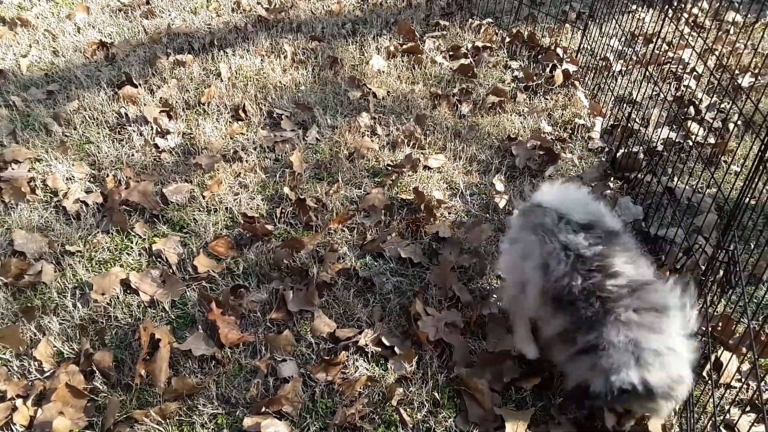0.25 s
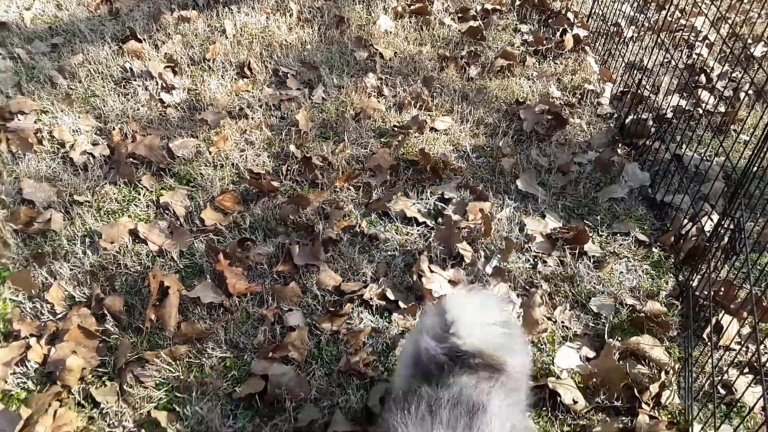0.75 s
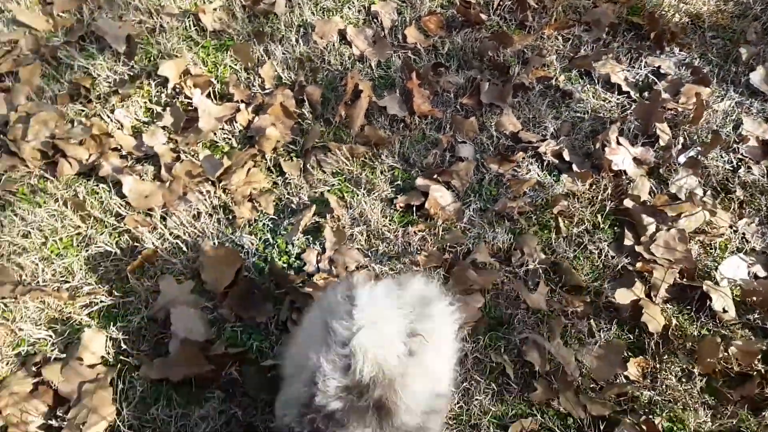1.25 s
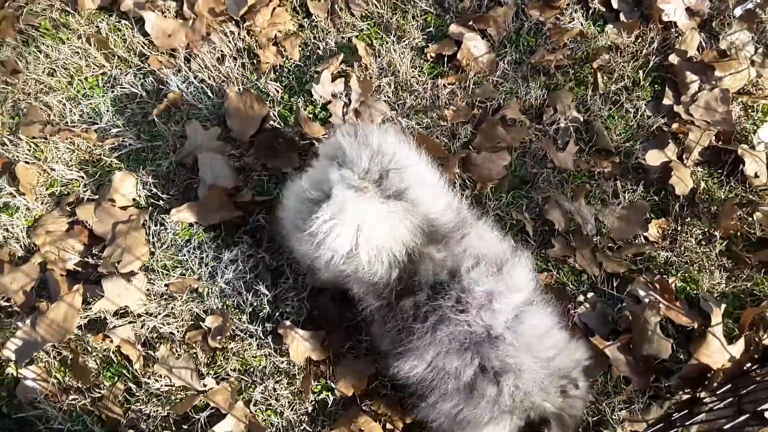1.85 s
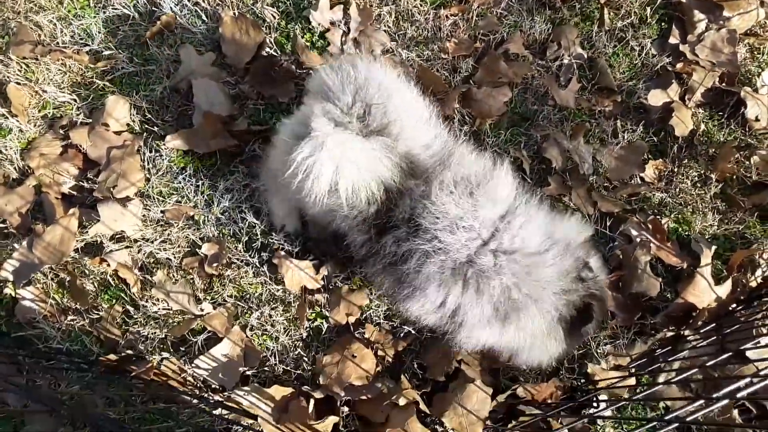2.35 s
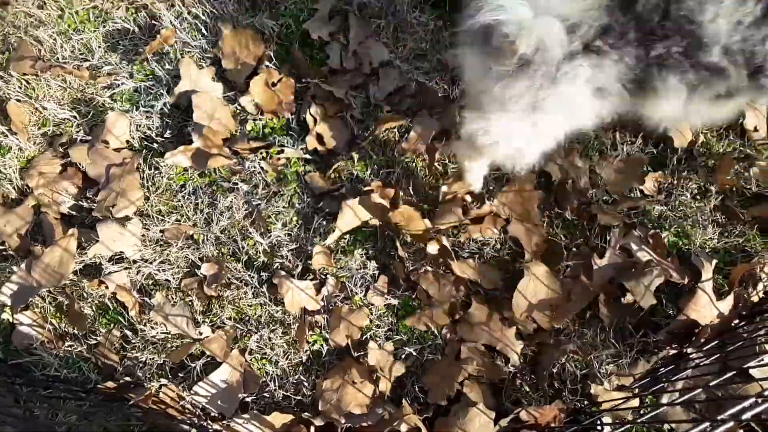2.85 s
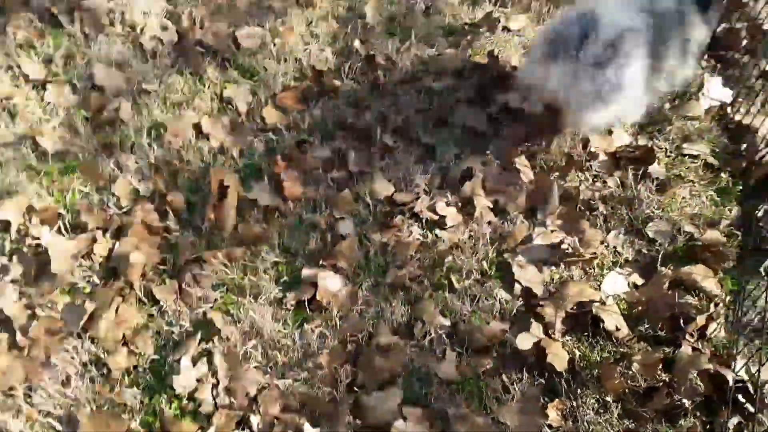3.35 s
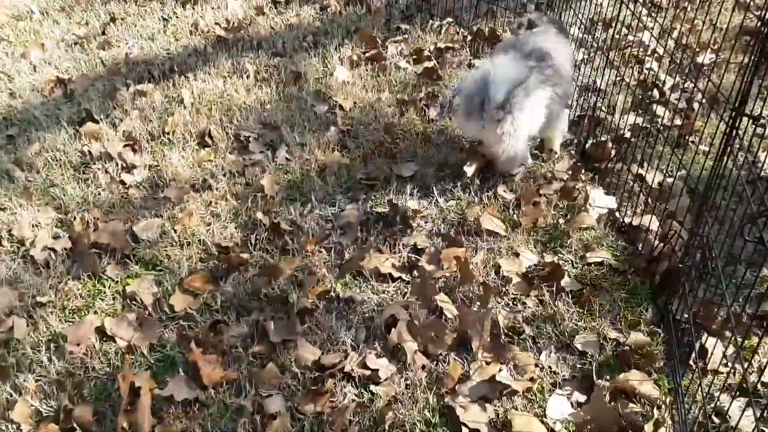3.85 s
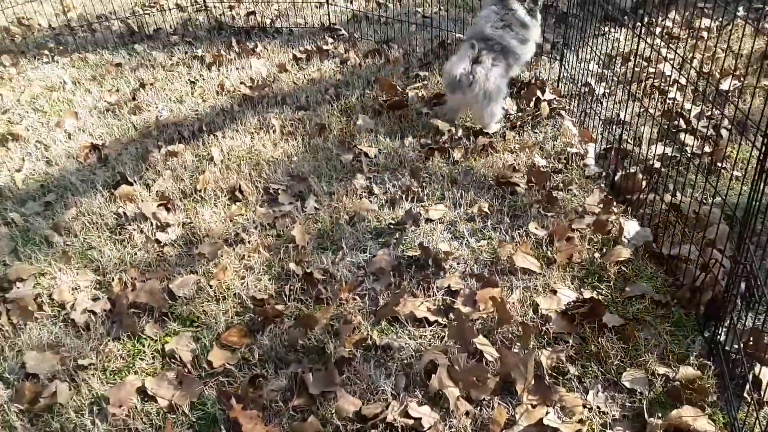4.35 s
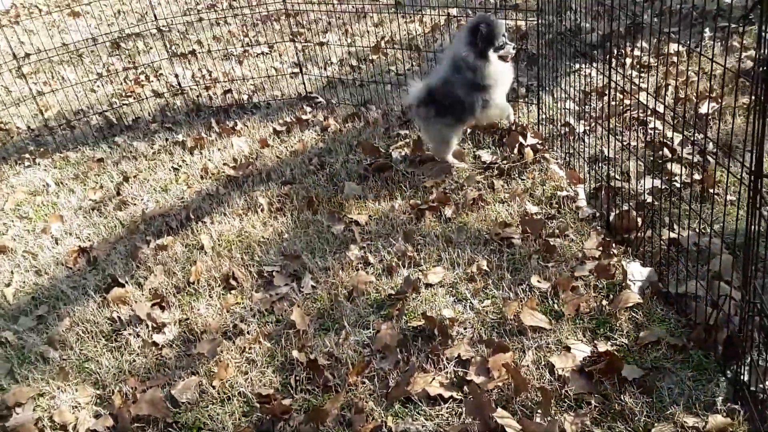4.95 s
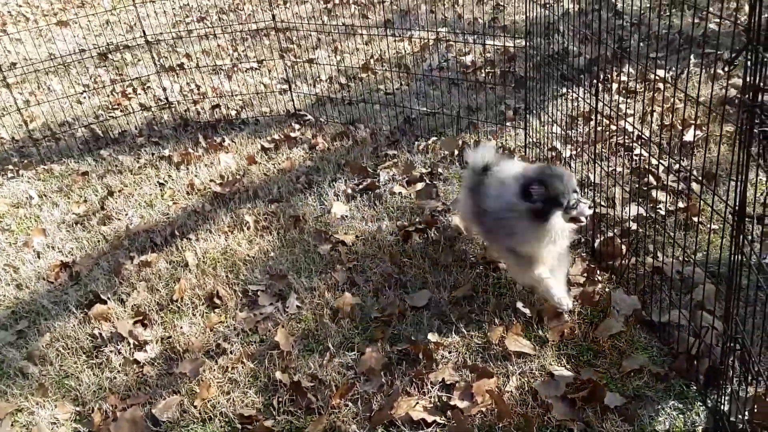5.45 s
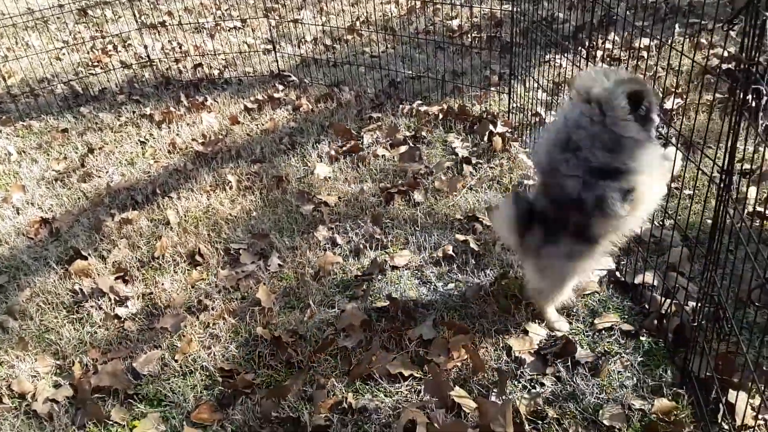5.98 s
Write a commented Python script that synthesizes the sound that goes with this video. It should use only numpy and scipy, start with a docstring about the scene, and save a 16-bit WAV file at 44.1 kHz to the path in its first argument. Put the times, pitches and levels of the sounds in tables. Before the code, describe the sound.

A small dog scampers through dry fallen leaves with crisp, irregular crunches and snaps, one tiny squeak, soft huffs, and a distant vehicle accelerating.

```python
"""A puppy scampers through dry leaves on a lawn, close to the microphones of a camera.
Each stroke of its paws crushes leaves into clouds of tiny cracks, and bursts of noise make single stems snap.
It gives one thin squeak, a gliding whistle, then huffs, noise shaped by its muzzle, along a wire pen whose
ringing tones tinkle faintly. Far away a motor vehicle, built from wavering tones, pulls away over traffic."""
import sys
import numpy as np
from scipy import signal
from scipy.fft import rfft, irfft, next_fast_len
from scipy.io import wavfile
from scipy.ndimage import uniform_filter1d, map_coordinates

SR = 44100
rng = np.random.default_rng(int(sys.argv[2]) if len(sys.argv) > 2 else 0)


def unload_audio(sound):
    """Save the sound as a 16-bit wav file, at the path given as the first command line argument."""
    columns = np.transpose(np.atleast_2d(sound))
    # keep every value between -1 and 1, then stretch to whole-number steps
    steps = np.round(np.clip(columns, -1, 1) * 32767)
    wavfile.write(sys.argv[1], SR, steps.astype(np.int16))


N = 274281  # length in samples
TOP_HZ = 16050  # upper limit of the sound

# The colour of leaves crushed close by. Each row: frequency in Hz, relative level in dB.
LEAF_COLOUR = [(150, -38), (250, -9), (947, -9.5), (1420, -7.5), (1940, 1.5), (2240, -14), (2810, -2.5),
               (3590, -5.5), (4280, 0), (5100, -6), (6520, 0.5), (8480, -7), (13100, -3.5), (15100, -11.5),
               (16500, -70)]


def amp(db):
    """Turn decibels into gain."""
    return 10 ** (np.asarray(db) / 20)


def unit(x):
    """Scale to an rms (average strength) of 1."""
    return x / np.sqrt(np.mean(x ** 2) + 1e-20)


def along(points, hz):
    """Read a table of (Hz, value) points on a logarithmic frequency axis."""
    f, v = np.transpose(points)
    return np.interp(np.log(hz + 1), np.log(f + 1), v)


def curves(rows):
    """Draw a line through each column after the time: one value per sample."""
    s, *cols = np.transpose(rows)
    return [np.interp(np.arange(N) / SR, s, c) for c in cols]


def during(rows):
    """Give 1 while a table lasts and 0 outside, with soft edges."""
    t = np.arange(N) / SR
    inside = (t >= rows[0][0]) & (t <= rows[-1][0])
    return uniform_filter1d(1. * inside, size=200)


def wobble(rate):
    """Make a smooth random curve with so many random points a second."""
    points = rng.standard_normal(int(N * rate / SR) + 4)
    return map_coordinates(points, [np.arange(N) * rate / SR])


def filtered(x, response):
    """Multiply the spectrum of a sound by a gain that depends on frequency."""
    n = x.shape[-1]
    m = next_fast_len(n + 8192)
    return irfft(rfft(x, m) * response(np.fft.rfftfreq(m, 1 / SR)), m)[..., :n]


def below(hz, edge_hz, order=8):
    """Gain that keeps what lies below an edge."""
    return 1 / np.sqrt(1 + (hz / edge_hz) ** order)


def above(hz, edge_hz, order=8):
    """Gain that keeps what lies above an edge."""
    return np.sqrt(1 - below(hz, edge_hz, order=order) ** 2)


def resonances(modes, hz):
    """Gain of a set of resonances, each with a centre in Hz, a width in Hz and a level in dB."""
    power = sum(amp(db) ** 2 / (1 + (2 * (hz - centre) / width) ** 2) ** 2 for centre, width, db in modes)
    return np.sqrt(power)


def panned(balance_db):
    """Left and right gains; a positive balance makes the left louder."""
    return amp(np.outer([.5, -.5], balance_db))


def add(track, s, sound):
    """Mix a sound into a stereo track at time s."""
    part = track[:, round(s * SR):][:, :sound.shape[1]]
    part += sound[:, :part.shape[1]]


def noise(spectrum, width):
    """Coloured stereo noise of rms 1; width is the difference signal relative to the shared one."""
    mid, side = filtered(rng.standard_normal((2, N)), lambda hz: amp(along(spectrum, hz)))
    return unit(np.array([mid + width * side, mid - width * side]))


def rustle():
    """The same cracks sound as bright crackle, as hollow curled leaves and as a dull push in the turf."""
    # Where the puppy is. Each row: time in seconds, distance from 0 (under the camera) to 1 (across the pen),
    # left-right balance in dB.
    puppy_path = [(0, 0.35, 2), (.6, 0.059, 0.3), (1.9, 0.089, 0.5), (2.6, 0.31, -0.9), (3.1, 0.28, -0.7),
                  (3.7, 0.84, -0.5), (4.3, 0.68, -1.5), (4.9, 0.94, -2.5), (5.55, 0.68, -0.3),
                  (6.22, 0.78, -1.5)]
    # The colour of leaves across the pen. Each row: frequency in Hz, relative level in dB.
    far_leaf_colour = [(150, -37), (250, -7), (387, -6.5), (823, -6), (1440, -12.5), (1720, -6),
                       (2710, -8.5), (3070, -6), (5100, -5), (5570, -2.5), (7760, 1.5), (10800, -6),
                       (15100, -8.5), (16500, -23)]
    # Air ringing in big curled leaves. Each row: frequency in Hz, width in Hz, relative level in dB.
    big_curl = [(1340, 500, -12.5), (1970, 600, 0)]
    # Air ringing in small curled leaves. Each row: frequency in Hz, width in Hz, relative level in dB.
    small_curl = [(2450, 250, -1), (2750, 450, 0)]

    away, balance_db = curves(puppy_path)
    away = np.clip(away, 0, 1)
    crackle_gain, big_gain, small_gain, fizz_gain, turf_gain = crushing(away)
    near_share, far_share = np.sqrt(1 - away), np.sqrt(away)

    # close by, leaves give way in clumps of distinct cracks
    fine = fractures(rate=6000, spread_db=3.0, life=0.001, ring=0.57)
    fine = unit(fine * amp(2.3 * wobble(60)))
    # leaf veins give way now and then: sparse, stronger cracks
    veins = unit(fractures(rate=110, spread_db=2.0, life=0.0009, ring=1.0))
    cracks = patchy(fine + amp(-6.5) * veins, depth_db=2.5)
    near = unit(filtered(cracks, lambda hz: amp(along(LEAF_COLOUR, np.minimum(hz, 14800)))))

    # from across the pen the cracks blend into a fine swish
    swish = fractures(rate=9000, spread_db=2.5, life=0.00073, ring=1.0)
    swish = patchy(swish * amp(0.92 * wobble(50)), depth_db=2.1)
    far = unit(filtered(swish, lambda hz: amp(along(far_leaf_colour, np.minimum(hz, 14800)))))

    cloud = near_share * near + far_share * far
    crackle = unit(filtered(cloud, lambda hz: above(hz, 3700) * below(hz, 9330)))
    fizz = unit(filtered(cloud, lambda hz: above(hz, 13900)))
    turf = unit(filtered(cloud, lambda hz: above(hz, 220) * below(hz, 1575)))

    # the hollow ring of curled leaves carries only close by; the far part is a plain band
    big = near_share * unit(filtered(cracks, lambda hz: resonances(big_curl, hz)))
    big += far_share * unit(filtered(far, lambda hz: above(hz, 1940) * below(hz, 2180)))
    small = near_share * unit(filtered(cracks, lambda hz: resonances(small_curl, hz)))
    small += far_share * unit(filtered(far, lambda hz: above(hz, 2590) * below(hz, 3900)))
    crumple = amp(-2.66) * (big_gain * big + small_gain * small)

    leaves = amp(-1.29) * crackle_gain * crackle
    leaves = leaves + amp(-0.5) * fizz_gain * fizz * panned(3.3)
    leaves = leaves + crumple * panned(4.1)
    return leaves * panned(balance_db) + turf_gain * turf * panned(2.2)


def crushing(away):
    """Gains of the leaf layers: each stroke swells and settles over a light stirring of leaves."""
    # Strokes of the paws, before the trims in the mix. Each row: start in seconds, length in seconds,
    # crackle level in dB, crumpling of whole leaves in dB relative to the crackle,
    # fizz in dB relative to the crackle, share of small leaves from 0 to 1.
    paw_strokes = [(0.111, 0.06, -37.5, -10, -14, 0.45), (0.147, 0.053, -31.5, -12, -10, 0),
                   (0.241, 0.02, -33, -10.5, -12, 0.2), (0.309, 0.03, -33, -8.5, -9, 0.3),
                   (0.474, 0.092, -35.5, -4, -6.5, 0.14), (0.57, 0.058, -34, -5, -8.5, 0.47),
                   (0.675, 0.045, -40.5, 3, -9, 0.59), (0.727, 0.038, -33.5, -8, -6, 0.7),
                   (0.827, 0.11, -34.0, -1.5, -5, 0.76), (0.913, 0.061, -34.5, 1, -8, 0.36),
                   (1.013, 0.069, -35, -5.5, -6.0, 0.6), (1.09, 0.036, -32.5, 1.5, -2, 0.7),
                   (1.231, 0.029, -38, -12, -6.0, 0.6), (1.282, 0.077, -44.5, -2, -3.0, 1),
                   (1.473, 0.017, -37, 5.5, -3.0, 0.66), (1.622, 0.023, -34.5, 1.5, 5.5, 0.7),
                   (1.664, 0.021, -26.0, 1.5, -4, 0.76), (1.796, 0.051, -34.5, -1, -4.0, 0.3),
                   (1.862, 0.031, -37.5, 0.5, -4.0, 0.5), (2.062, 0.12, -45.5, 2, -2.0, 0.9),
                   (2.422, 0.054, -44.5, -11, -6, 0.6), (2.493, 0.163, -37, -5.0, -2, 0.35),
                   (2.648, 0.049, -35.5, 2.5, 2, 0.76), (2.728, 0.053, -37, -16, -6, 0.45),
                   (2.829, 0.064, -39.5, -4, 1, 0.7), (3.016, 0.049, -28, -7.0, -7.0, 0),
                   (3.128, 0.057, -29.5, -6.5, -3, 0.2), (3.263, 0.16, -40, -15, -5, 0.3),
                   (3.543, 0.07, -37.5, -2.0, -8, 0.66), (3.641, 0.075, -34.5, -6, -8, 0.67),
                   (3.734, 0.26, -34.5, -7.0, -6.5, 0.65), (4.016, 0.084, -39.5, -7, -5, 0.8),
                   (4.194, 0.094, -46.5, -9, 0, 0.82), (4.283, 0.037, -39.5, 0, 1, 0.81),
                   (4.368, 0.023, -42.5, -3.5, -12.0, 0.9), (4.472, 0.16, -48.5, -8, 3, 0.71),
                   (4.73, 0.18, -31.5, -9.0, -11.0, 0.6), (5.029, 0.05, -33, -5.5, -22, 0),
                   (5.317, 0.1, -43.5, -5, -6.0, 0.3), (5.514, 0.088, -39.5, -13, -8, 0.35),
                   (5.64, 0.056, -40, -9.5, -6, 0.36), (5.903, 0.037, -36, -18, -3, 0.86),
                   (5.97, 0.19, -39, -10.5, -4, 0.9), (6.127, 0.072, -32, -7, -14, 0.88)]
    # Light stirring between strokes, before the trims in the mix. Each row: time in seconds, crackle level in dB.
    light_stir = [(0.0, -61.5), (0.1, -67), (0.11, -65), (0.44, -47.5), (0.82, -52), (1.15, -43),
                  (1.6, -43), (2.02, -46), (2.35, -51), (2.8, -44), (3.0, -44.5), (3.55, -38), (4.1, -44),
                  (4.7, -52.5), (4.97, -45), (5.25, -50), (5.8, -55), (6.2, -42.5)]
    attack_s, release_s = 0.037, 0.18  # a paw presses in; the leaves settle by 60 dB
    turf_db, turf_per_crumple = -15.5, 0.27  # push in the turf relative to crackle; dB more per dB of crumpling

    stir_db, = curves(light_stir)
    # stirred leaves crumple less from across the pen
    curl_db = stir_db - 8 - 6 * away
    # layer order: crackle, big curled leaves, small curled leaves, fizz, turf
    power = amp([stir_db, curl_db, curl_db, stir_db - 6.5, stir_db - 13.9]) ** 2
    u = np.arange(SR // 2) / SR
    for s, length, db, crumple_db, fizz_db, small in paw_strokes:
        press = np.minimum(u / attack_s, 1) * amp(-60 * np.maximum(u - length, 0) / release_s)
        colour = amp([0, crumple_db, crumple_db, fizz_db, turf_db + turf_per_crumple * crumple_db])
        small = np.clip(small, 0, 1)
        layer_power = (amp(db) * colour) ** 2 * [1, 1 - small, small, 1, 1]
        add(power, s, np.outer(layer_power, press ** 2))
    return np.sqrt(power)


def fractures(rate, spread_db, life, ring, count=96):
    """A cloud of tiny cracks, rate a second: each is a tick and a few cycles of its own scrap of leaf."""
    n = int(rate * N / SR)
    when, pitch, place, side = rng.random((n, 4)).T
    # most cracks are weak and a few are strong
    size = amp(spread_db * np.minimum(rng.exponential(size=n), 4))
    t = np.arange(count) / SR
    hz = 1200 * (16000 / 1200) ** pitch[:, None]
    # life is the time constant of the ringing in seconds
    shape = ring * np.sqrt(hz / SR) * np.sin(2 * np.pi * hz * t) * np.exp(-t / life)
    shape[:, 0] = 1  # the tick
    shape *= (size * rng.choice([-1, 1], n))[:, None]
    # the paws wander and leaves lie around them, so each crack reaches the two microphones at its own moments
    lag = 2.4 * wobble(5)[(when * N).astype(int)] + (place - .5) * 4  # in samples
    ears = []
    for sign in (1, -1):
        start = np.maximum(when * N + sign * lag, 0).astype(int)
        gain = 1 + sign * (side - .5)
        where = start[:, None] + np.arange(count)
        ears.append(np.bincount(where.ravel(), (shape * gain[:, None]).ravel(), N)[:N])
    return np.array(ears)


def patchy(x, depth_db):
    """Each leaf touched has its own colour: random gain patches in pitch and time."""
    z = signal.stft(x, nperseg=512)[2]
    field = rng.standard_normal(z.shape[1:])
    # smooth the random field over neighbouring pitches and moments
    for size in (5, 3):
        field = uniform_filter1d(field, size=size, axis=0)
        field = uniform_filter1d(field, size=2 * size, axis=1)
    return signal.istft(z * amp(depth_db * unit(field)), nperseg=512)[1][:, :N]


def paws():
    """A landing crushes many leaves at once: a quick rise, then the crunch dies away."""
    # Paw landings. Each row: start in seconds, strength in dB before a 12 dB cut,
    # hollow part in dB relative to the bright part.
    landings = [(0.696, -24, 0.5), (0.84, -18, -16), (1.6801, -15, -20), (2.248, -27, -1),
                (3.026, -11.5, -21), (3.1522, -16, -14), (4.755, -7, -3.5), (5.5268, -27, -11),
                (6.173, -13.5, -20)]
    cloud = fractures(rate=7000, spread_db=6.5, life=0.0011, ring=0.28)
    cloud = filtered(cloud, lambda hz: amp(along(LEAF_COLOUR, hz)))
    bright = unit(filtered(cloud, lambda hz: above(hz, 4700) * below(hz, 8200, order=4)))
    hollow = unit(filtered(cloud, lambda hz: above(hz, 200) * below(hz, 2050)))
    out, t = np.zeros((2, N)), np.arange(SR // 5) / SR
    press = (1 - np.exp(-t / 0.0019)) * amp(-60 * t / 0.072)
    for s, db, hollow_db in landings:
        span = slice(round(s * SR), round(s * SR) + len(t))
        crunch = bright[:, span] + amp(hollow_db) * hollow[:, span]
        add(out, s, amp(db - 12.0) * crunch * press[:crunch.shape[1]])
    return out


def snaps():
    """A stem breaks in a few milliseconds; the leaf around it colours the crack and shivers on."""
    # Single leaves and stems breaking. Each row: start in seconds, strength in dB before a 24 dB cut,
    # pitch in Hz, left-right balance in dB.
    breaks = [(0.111, -24.5, 7200, 2), (0.125, -18.5, 6740, 5), (0.266, -19, 6750, -2),
              (0.9814, -16.5, 2020, -2), (1.068, -17, 3740, -2), (1.081, -11, 6550, 4),
              (1.115, -25, 2210, 2.0), (1.7051, -4.5, 14000, 4), (1.748, -2.5, 5300, 1),
              (1.7642, -17, 4860, 0), (1.919, -12, 2000, -1), (1.9305, -17, 2290, 11),
              (1.955, -23, 2450, -3), (2.125, -21, 2820, 5), (2.1365, -8, 11600, 3),
              (2.3622, -25.5, 4230, 0.0), (2.385, -27, 4630, -4), (2.4908, -21, 6690, -3),
              (2.5215, -19.5, 4330, -1), (2.6886, -14, 2600, -3), (2.7725, -21, 6760, -1),
              (3.0938, -15.5, 6400, 0.5), (3.1837, -2.5, 5850, -2.5), (3.1947, -17, 6000, -2),
              (3.385, -13.5, 6700, 0), (4.739, -16, 2770, 2), (4.759, -6, 4250, 3), (5.08, -16, 7300, 0),
              (5.0874, -12, 6840, -1), (5.3, -21, 8720, 1), (5.3406, -20, 8070, 1), (5.826, -25, 6100, 3),
              (6.124, -12, 9400, -5)]
    out, t = np.zeros((2, N)), np.arange(SR // 25) / SR
    # a sharp break, then a weaker and slower shiver
    tear = (1 - np.exp(-t / 0.00043)) * (amp(-60 * t / 0.025) + amp(-23 - 60 * t / 0.043))
    for s, db, hz, balance_db in breaks:
        burst = rng.standard_normal((2, len(t))) * tear
        leaf = signal.lfilter(*signal.iirpeak(min(hz, TOP_HZ), 2.2, SR), burst)
        crack = signal.lfilter(*signal.butter(2, 1300, "high", fs=SR), 0.57 * burst + leaf)
        add(out, s, amp(db - 24.0) * unit(crack) * panned(balance_db))
    return out


def squeak():
    """A nearly pure whistle that flips up and falls back, beating against its own echoes."""
    # The whistle's glide. Each row: time in seconds, pitch in Hz, level in dB.
    glide = [(3.414, 1554, -39), (3.421, 1560, -27), (3.431, 1607, -20.5), (3.445, 1680, -17),
             (3.452, 1885, -44), (3.463, 1954, -33), (3.471, 1830, -35), (3.477, 1600, -25.5),
             (3.501, 1440, -46)]
    # Echoes off nearby surfaces. Each row: delay in seconds, level in dB relative to the whistle.
    bounces = [(.009, -21), (0.02, -16.5)]
    hz, db = curves(glide)
    phase = 2 * np.pi * np.cumsum(hz * (1 + 0.0049 * wobble(250))) / SR
    wave = np.sin(phase) + amp(-34) * np.sin(4 * phase)  # with a faint fourth harmonic
    tone = amp(db) * during(glide) * np.sqrt(2) * wave
    echoes = sum(amp(level) * np.pad(tone, (round(delay * SR), 0))[:N] for delay, level in bounces)
    return (tone + echoes) * panned(-5.5)


def huffs():
    """Short puffs of air ring in the puppy's muzzle."""
    # The puffs. Each row: start in seconds, length in seconds, level in dB.
    puffs = [(5.035, 0.079, -45), (5.107, 0.067, -49), (5.233, 0.11, -53.5), (5.329, 0.15, -48.5),
             (5.523, 0.058, -56), (5.62, 0.11, -53)]
    # Resonances of the muzzle. Each row: frequency in Hz, width in Hz, relative level in dB.
    muzzle = [(635, 17, 5.5), (966, 370, -1.5), (1940, 140, 1.5), (2260, 43, -17), (3820, 170, 0)]
    air = unit(filtered(rng.standard_normal(N), lambda hz: resonances(muzzle, hz)))
    t = np.arange(N) / SR
    # each puff swells and fades as half a sine
    flow = sum(amp(db) * np.sin(np.pi * np.clip((t - s) / length, 0, 1)) for s, length, db in puffs)
    return air * flow * panned(.5)


def pen():
    """A brushed wire rings thinly, its tones at new strengths and slightly new pitches each time."""
    # Light touches on the pen. Each row: start in seconds, strength in dB.
    touches = [(4.452, -38), (4.529, -48), (4.63, -48), (5.9, -50), (6.059, -47)]
    # Ringing tones of the wires. Each row: frequency in Hz, relative level in dB.
    wire_tones = [(8200, -0.5), (9000, -10), (14400, -9), (15150, -6)]
    out, t = np.zeros((2, N)), np.arange(SR // 5) / SR
    for s, db in touches:
        ring = 0
        for hz, level in wire_tones:
            strength = amp(level + rng.normal(0, 3, (2, 1)))  # its own in each ear
            ring = ring + strength * np.sin(2 * np.pi * hz * rng.normal(1, 0.0069) * t)
        add(out, s, amp(db) * ring * (1 - np.exp(-t / .004)) * amp(-60 * t / 0.17))
    return out


def yard(x):
    """A short, thin scatter from the ground and the fence: a tail of noise that dies away."""
    # How fast the scatter fades. Each row: frequency in Hz, time to fall by 60 dB in seconds.
    fade_times = [(200, 0.079), (2000, 0.11), (12000, 0.16)]
    hz, t, z = signal.stft(rng.standard_normal((2, SR // 4)), SR, nperseg=256)
    fade = amp(-60 * t / along(fade_times, hz)[:, None])
    tail = signal.istft(z * fade, SR, nperseg=256)[1]
    return signal.fftconvolve(x, tail / np.linalg.norm(tail[0]), axes=1)[:, :N]


def traffic():
    """A far engine gathers speed over road rumble; moving air makes its tones waver."""
    # The far engine. Each row: time in seconds, firing rate in Hz, level in dB.
    engine_path = [(2.9, 78, -64), (3.39, 95.5, -61), (3.73, 117.4, -55.5), (4.06, 125.3, -50.5),
                   (4.35, 127.8, -62.5), (4.74, 128.5, -50), (5.02, 136.9, -52), (5.23, 148.4, -52.5),
                   (5.69, 154.5, -51), (5.85, 141.1, -53.5), (6.22, 168, -54)]
    # A steady drone in the traffic. Each row: time in seconds, level in dB.
    drone_path = [(3.5, -63), (3.95, -60), (4.27, -51.5), (4.9, -57), (5.95, -56), (6.22, -56)]
    # Constant low tones. Each row: frequency in Hz, level in dB.
    hum_tones = [(95, -68), (143, -74)]
    # Loudness of the road rumble. Each row: time in seconds, level in dB.
    road_path = [(0.0, -60.5), (2.0, -57), (3.05, -55.5), (4.3, -55.5), (5.2, -51.5), (6.22, -53)]
    # Colour of the road rumble. Each row: frequency in Hz, relative level in dB.
    road_colour = [(15, -63), (25, -37), (40, -15.5), (81, -0.5), (98, 5), (118, 0), (151, 1.5), (199, 1),
                   (400, -16), (520, -28), (880, -120)]

    def tone(hz, db):
        """A sine that wavers in pitch and level."""
        phase = 2 * np.pi * np.cumsum(hz * (1 + 0.0085 * wobble(12))) / SR
        return np.sqrt(2) * amp(db + 1.7 * wobble(19)) * np.sin(phase)

    hz, db = curves(engine_path)
    # a lower boom comes in once the engine is up to speed
    boom_db = -7 + 1.6 * np.minimum(hz - 136, 0)
    engine = tone(hz, db) + tone(.615 * hz, db + boom_db) + tone(2 * hz, db - 17.0)
    drone_db, = curves(drone_path)
    drone = tone(171.8, drone_db)
    hum = sum(tone(f, level) for f, level in hum_tones)
    road_db, = curves(road_path)
    road = amp(road_db) * noise(road_colour, width=0.2)
    return (engine * during(engine_path) + drone * during(drone_path) + hum + road) * panned(1.2)


def quiet_air():
    """A faint, wide hiss of steady noise."""
    # Colour of the air. Each row: frequency in Hz, relative level in dB.
    air_colour = [(120, -41), (200, -13), (259, -5.5), (491, -12), (1870, -3), (3430, -8), (6880, -9),
                  (16000, -43)]
    return amp(-58) * noise(air_colour, width=1.0)


def scene():
    """The puppy close by with its scatter, traffic and quiet air behind it."""
    puppy = rustle() + paws() + snaps() + squeak() + huffs() + pen()
    return puppy + amp(-11.5) * yard(puppy) + traffic() + quiet_air()


def record(dry):
    """A very steep low-pass: the camera lets almost nothing through above its band limit."""
    return filtered(dry, lambda hz: below(hz, TOP_HZ, order=200))


dry = scene()
out = record(dry)
unload_audio(out)
```